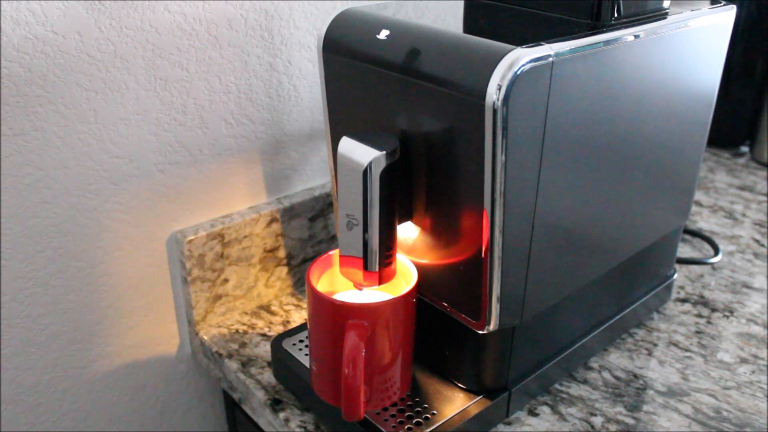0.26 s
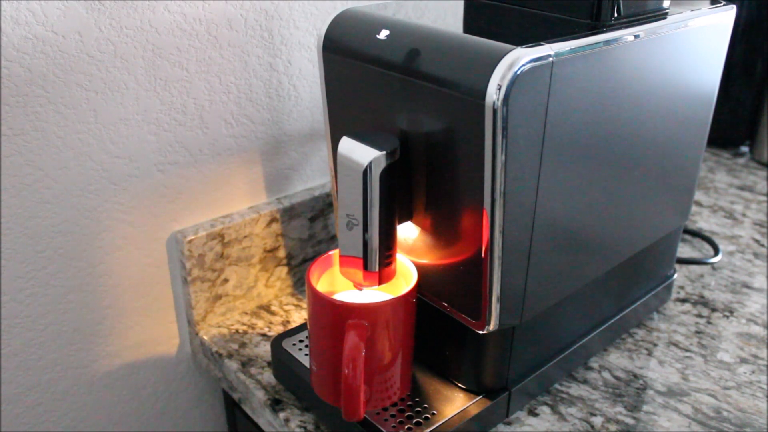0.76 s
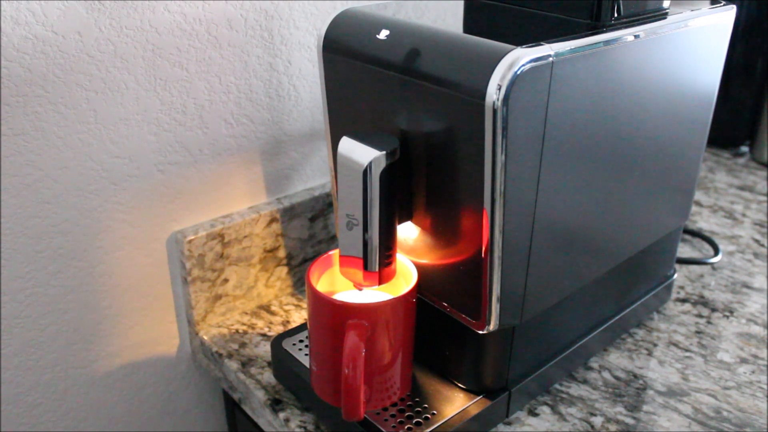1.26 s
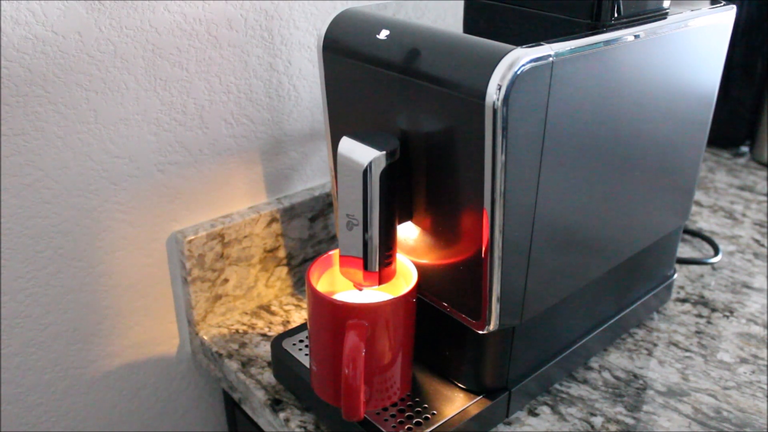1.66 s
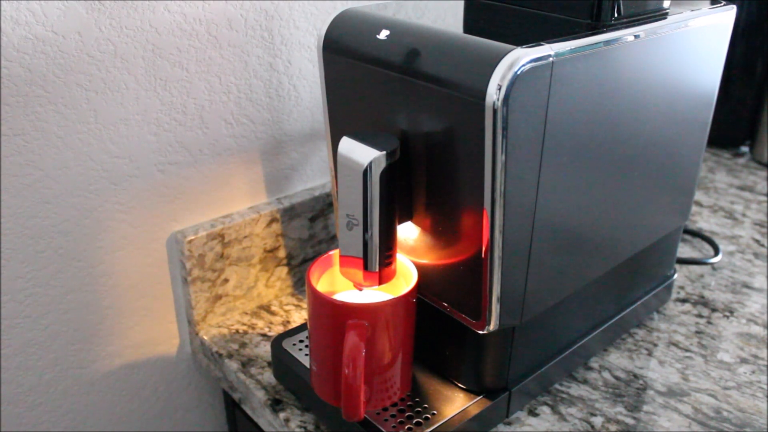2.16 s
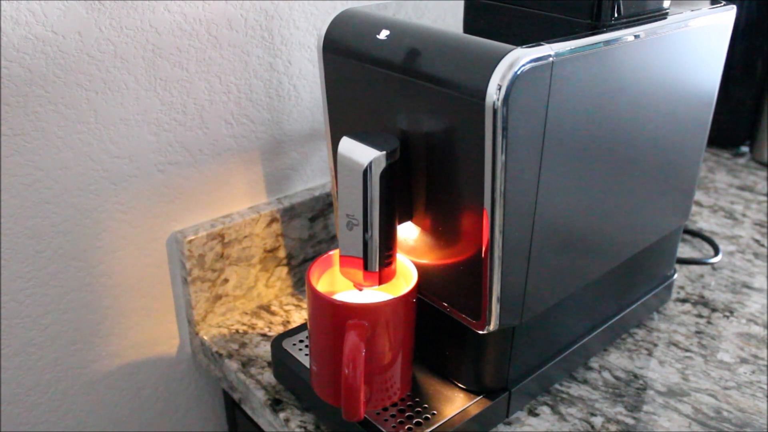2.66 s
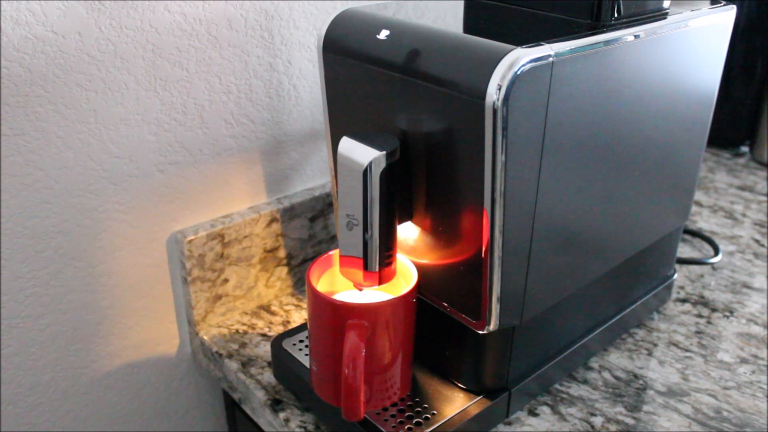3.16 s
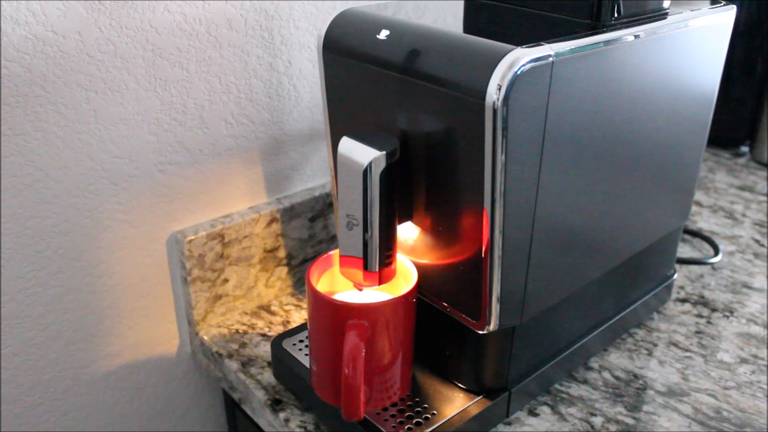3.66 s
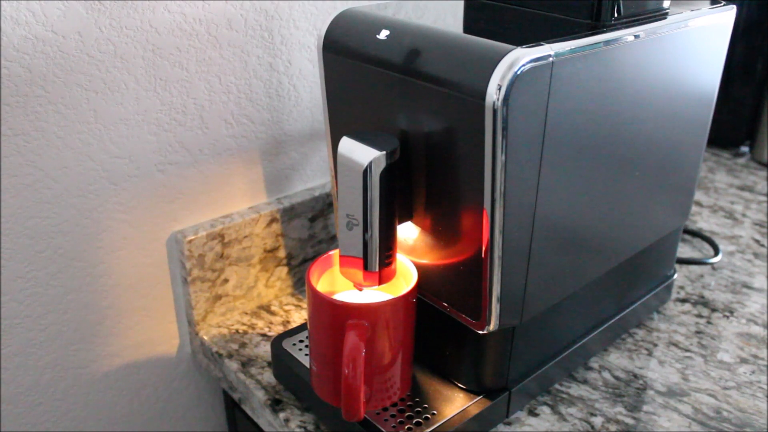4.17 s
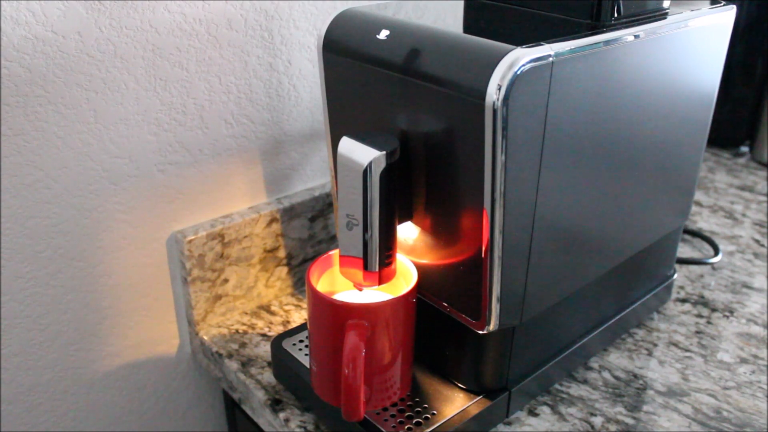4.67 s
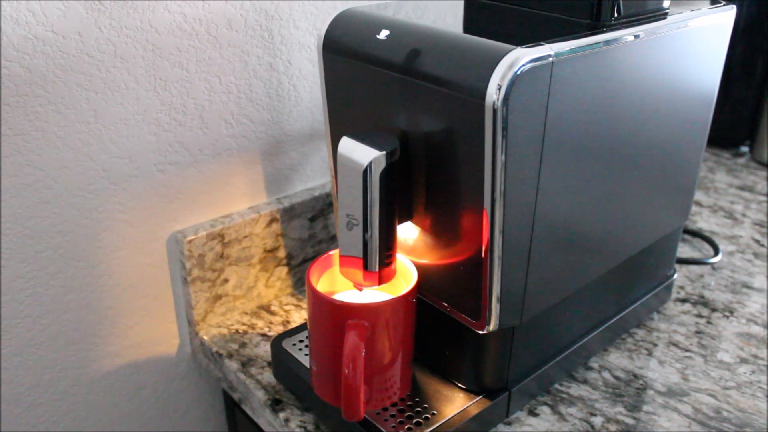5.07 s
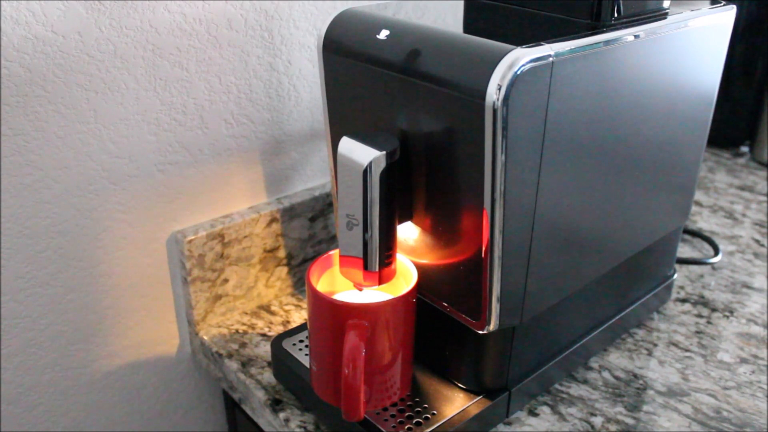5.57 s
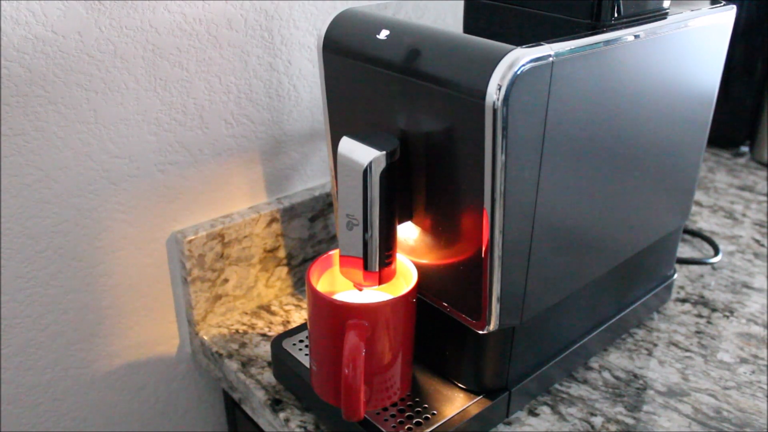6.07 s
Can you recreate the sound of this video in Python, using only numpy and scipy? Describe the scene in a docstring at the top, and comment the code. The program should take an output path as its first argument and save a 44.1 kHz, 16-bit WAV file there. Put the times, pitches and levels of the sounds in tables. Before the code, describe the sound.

A faint switch tick sounds over quiet kitchen hum. A coffee machine's geared motor then starts with a clack and whines for about two seconds, its gears rattling in the plastic housing, until it clacks to a stop. After a short pause it runs again, slightly faster, with a brief moan and a few knocks, ending in another clack. The small, hard room rings lightly.

```python
"""A faint switch tick over quiet kitchen hum, then a coffee machine drives its brewing mechanism
out and back. On each run a geared motor whines, its teeth rattle in the plastic housing and its
brushes hiss. The mechanism clacks as it takes up slack and meets the end stop, the machine shudders
on the counter as the load changes, and a sliding part moans on the way back.
A small hard room rings after it all."""
import sys
import numpy as np
from scipy import signal
from scipy.fft import rfft, irfft
from scipy.io import wavfile
from scipy.ndimage import map_coordinates

SR = 44100
rng = np.random.default_rng(int(sys.argv[2]) if len(sys.argv) > 2 else 0)


def persist_wave(psi):
    """Save psi, clipped to +-1, as 16-bit WAV."""
    counts = np.round(np.clip(psi, -1, 1) * 32767).astype(np.int16)
    wavfile.write(sys.argv[1], SR, np.atleast_2d(counts).T)


N = 279153
T = np.arange(N) / SR
HZ = np.fft.rfftfreq(N, 1 / SR)
OUT, BACK = 0, 1  # direction of travel
MESH = 5  # tooth contacts per shaft turn: the main note of the whine


def amp(db):
    """Decibels to gain."""
    return 10 ** (np.asarray(db) / 20)


def unit(x):
    """Scales to rms 1."""
    return x / np.sqrt(np.mean(x ** 2) + 1e-20)


def curve_at(points, hz):
    """Interpolates a curve on a logarithmic frequency axis."""
    f, value = np.transpose(points)
    return np.interp(np.log(hz + 1), np.log(f + 1), value)


def bell(hz, centre, width):
    """A resonance peak of height 1; width is taken at half height."""
    return 1 / (1 + ((hz - centre) / (width / 2)) ** 2)


def colour(x, gain):
    """Filters a full-length signal by a gain for each frequency."""
    return irfft(rfft(x) * gain, N)


def noise(gain):
    """Coloured noise of rms 1."""
    return unit(colour(rng.standard_normal(N), gain))


def drift(rate_hz):
    """Slow random motion of rms 1."""
    return noise(1 / (1 + (HZ / rate_hz) ** 4))


def impulse(db):
    """The causal impulse response with this spectrum."""
    log_gain = np.log(amp(np.r_[db, db[-2:0:-1]]))
    return np.fft.ifft(np.exp(np.conj(signal.hilbert(log_gain)))).real[:len(db) - 1]


def room_tone():
    """A bed of soft air with a few faint, wavering hum lines."""
    # spectrum of the air: f/Hz, relative level/dB
    air_eq = [(25, -19), (82, -9.5), (123, -13.5), (150, -6.5), (194, -1.5), (310, -5.5), (382, 1),
              (440, -8), (620, -5), (800, -11), (2330, -22), (5000, -28), (9000, -32.5), (15800, -31.5)]
    # hum lines: f/Hz, relative level/dB
    hum_lines = [(150.7, -66), (188.4, -60), (393.0, -70), (473.7, -61.5)]
    air = noise(amp(curve_at(air_eq, HZ)))
    hum = sum(amp(db) * np.sqrt(2) * np.sin(2 * np.pi * hz * T + 0.76 * drift(1.2))
              for hz, db in hum_lines)
    return amp(-51.5) * air + amp(-3) * hum


def blows(hits, body_eq, ring, size=4096):
    """Each blow is a sharp contact and a chatter of loose parts, sounding through body and frame."""
    # modes of the struck frame: f/Hz, relative level/dB, t60/s
    frame_modes = [(372, -6, .08), (560, -3, .07), (765, 0, .1), (1030, -7, .05), (1308, -9, .07),
                   (1600, -6, .06), (1750, -7, .06), (2444, -13, .07)]
    out, t = np.zeros(N), np.arange(2 * size) / SR
    hz = np.fft.rfftfreq(size, 1 / SR)
    octaves = np.log2(np.clip(hz, 200, 8000) / 1000)
    frame = sum(amp(db - 60 * t / t60) * np.cos(2 * np.pi * f * t) for f, db, t60 in frame_modes)
    midrange = signal.butter(2, [300, 2800], "bandpass", fs=SR)  # where the frame radiates
    body = np.pad(impulse(curve_at(body_eq, hz)), (0, len(t) - size // 2))
    response = unit(body) + ring * unit(signal.lfilter(*midrange, frame))
    for s, db, tilt, chatter_s, pitch, boost_db in hits:
        chatter = (1 - np.exp(-t / 0.000059)) * np.exp(-(t / chatter_s) ** 1.21)
        contact = 0.26 * rng.standard_normal(len(t)) * chatter
        contact[0] += 1  # the first sharp impact
        struck_part = impulse(boost_db * bell(hz, pitch, 0.24 * pitch) + tilt * octaves)
        hit = signal.fftconvolve(signal.fftconvolve(contact, struck_part), response)[:len(t)]
        attack_rms = np.sqrt(np.mean(hit[:SR // 50] ** 2))  # first 20 ms
        slot = out[round(s * SR):][:len(hit)]
        slot += amp(db) * hit[:len(slot)] / attack_rms
    return out


def switch_ticks():
    """Small, bright switch contacts that barely ring the frame."""
    # ticks: t/s, attack level/dB, tilt/(dB/octave), chatter/s, part f/Hz, part boost/dB
    hits = [(0.5555, -42.5, -2.5, 0.0099, 3530, 1), (1.0703, -49.5, 11, 0.0041, 5040, 16),
            (2.931, -46, 0, 0.0023, 6455, -7), (4.1578, -49, 1, 0.0039, 1495, 8)]
    # body of a tick: f/Hz, relative level/dB
    body_eq = [(40, -36), (200, 2), (800, -18), (1800, -5), (3500, -4.5), (4600, -6), (5600, -2.5),
               (6500, -8), (9000, -15), (15000, -21)]
    return blows(hits, body_eq, ring=0.15)


def gear_whine(turns, way, flutter, low_db, middle_db):
    """Gear lines locked to the shaft; each flutters on its own in level and phase."""
    # gear lines: multiple of shaft speed, relative level out/dB, relative level back/dB
    partials = [(2, -21, -30), (3, -29, -19), (4, -26, -10), (5, 0, 0), (7, -27, -18), (8, -18, -26),
                (9, -8, -10), (9.5, -16, -33), (10, -10, -9), (11, -20, -20), (11.25, -18, -24),
                (13, -23, -16), (15, -23, -20), (16, -24, -21), (17, -30, -23), (20, -22, -18),
                (21.25, -17, -38), (23, -21, -23), (25, -23, -21), (28, -22, -26)]
    out = np.zeros(N)
    shakes = [drift(30) for _ in range(6)]
    low, middle = amp(low_db), amp(middle_db)
    for multiple, *levels_db in partials:
        gain = low if multiple <= MESH else middle if multiple < 12 else 1
        swell, lag = (np.roll(shakes[i], rng.integers(N)) for i in rng.permutation(6)[:2])
        cycles = multiple * (turns + 0.003 * lag) + rng.random()
        out += amp(levels_db[way]) * gain * (1 + flutter * swell) * np.sin(2 * np.pi * cycles)
    return out


def gear_rattle(turns, housing_eq, repeat, bite=0.45, grit_db=1.2):
    """Teeth scrape inside the housing: the share `repeat` loops with a wheel, the rest is chance."""
    # narrow resonances of the housing: f/Hz, width/Hz, boost/dB
    panels = [(1514, 125, 3), (1762, 125, 4), (2040, 43, 10), (2120, 21, 6.5), (2420, 135, 10.5),
              (2560, 11, 11.5), (2930, 20, 6), (3165, 150, 8), (4170, 51, 9.5)]
    surface = rng.standard_normal(1536)
    position = (turns / 4 % 1) * len(surface)  # the wheel goes round once in four shaft turns
    wheel = map_coordinates(surface, [position], order=3, mode="grid-wrap")
    scrape = np.sqrt(repeat) * unit(wheel) + np.sqrt(1 - repeat) * rng.standard_normal(N)
    teeth = MESH * turns
    force = amp(grit_db * rng.standard_normal(N))[teeth.astype(int)]  # no two teeth land equally hard
    scrape *= force * (1 + bite * np.cos(2 * np.pi * teeth))
    gain = amp(curve_at(housing_eq, HZ) + sum(db * bell(HZ, hz, width) for hz, width, db in panels))
    gain *= HZ ** 2 / (HZ ** 2 + 150 ** 2)  # low cut
    presence = (HZ > 1400) & (HZ < 4500)  # this band sets the level
    return colour(unit(scrape), gain / np.sqrt(np.mean((gain * presence) ** 2)))


def brush_hiss(turns, way):
    """Carbon brushes hiss on the commutator, swelling once a turn, and ring small metal parts."""
    # metal resonances: f/Hz, width/Hz, relative level out/dB, relative level back/dB
    resonances = [(5980, 90, -5, -9), (6270, 130, 0, -2), (6550, 200, -6, 0), (6820, 70, 0, -6),
                  (7020, 60, -6, -14), (7240, 150, -3, -3), (7540, 200, -6, -6), (7850, 200, -10, -11),
                  (15550, 400, -35, -16)]
    power = sum(amp(levels_db[way]) ** 2 * bell(HZ, hz, width) ** 1.74
                for hz, width, *levels_db in resonances)
    return noise(np.sqrt(power)) * (1 + 0.22 * np.cos(2 * np.pi * turns))


def counter_rumble(thump_db=0):
    """Low vibration that the machine sends into the counter, at rms 1; a jolt adds a thump."""
    # f/Hz, relative level/dB
    rumble_eq = [(25, -21), (75, -9), (115, -6.5), (200, -1), (300, 2.5), (450, -2.5), (2000, -70)]
    return noise(amp(curve_at(rumble_eq, HZ) + thump_db * bell(HZ, centre=80.5, width=46)))


def whistle(speed, turns, multiple=90):
    """A high shaft harmonic whistles, thin and blurred, as it crosses a narrow resonance."""
    nearness = bell(multiple * speed, centre=10380, width=160)
    return amp(-68.5) * nearness * np.sin(2 * np.pi * multiple * turns + 0.92 * drift(60))


def motor_run(way, speeds, housing_eq, start_s, stop_s, crest_s, whine_db, middle_db, middle_db_per_s,
              rattle_db, rumble_db, brush_db, repeat, flutter):
    """The geared motor spins up, works and coasts; its speed sets the gears' pitch and level."""
    # dips of the main note and the lines below it: t/s, half length/s, depth/dB
    dips = [(1.17, 0.14, 10), (1.416, 0.024, 5.5), (2.268, 0.037, 3.5), (2.436, .05, 7), (4.488, 0.06, 29),
            (4.855, 0.12, 2.5), (5.97, 0.08, 1.5)]
    age = np.clip(T - start_s, 0, stop_s - start_s)
    starting = np.exp(-age / 0.03)
    coast_s = np.clip(T - stop_s, 0, 0.2)
    working_hz = np.interp(T, *np.transpose(speeds))
    speed = working_hz * (1 - 0.13 * starting) - 200 * coast_s
    turns = np.cumsum(speed * (1 + 0.0012 * drift(8))) / SR
    envelope = (T > start_s) * amp(-11 * starting - 387 * coast_s)
    dip_db = sum(depth * np.exp(-((T - s) / length) ** 2) for s, length, depth in dips)
    low_db = 0.14 * drift(9.4) - dip_db
    # a slow, slightly eccentric wheel sways the middle lines, with one crest at crest_s
    sway_db = 2.5 * np.cos(2 * np.pi * (turns - np.interp(crest_s, T, turns)) / 21.4)
    travel_db = middle_db_per_s * (age - (stop_s - start_s) / 2)
    whine = gear_whine(turns, way, flutter, low_db, middle_db + sway_db + travel_db)
    rattle = gear_rattle(turns, housing_eq, repeat)
    hiss = brush_hiss(turns, way)
    excess_hz = working_hz - 118  # faster gears are louder
    gears = amp(whine_db + 0.22 * excess_hz) * whine + amp(rattle_db + 0.6656 * excess_hz) * rattle
    rumble = amp(rumble_db) * counter_rumble()
    return envelope * (gears + rumble + amp(brush_db) * hiss + whistle(speed, turns))


def run_out():
    """The motor drives the mechanism out, with a rattle that mostly loops."""
    # shaft speed under the changing load: t/s, f/Hz
    speeds = [(1.18, 113.9), (1.218, 116.8), (1.302, 109.2), (1.38, 114.9), (2.154, 114.6), (2.626, 120),
              (2.812, 118.7), (2.886, 115.4), (2.94, 115.9)]
    # what the housing lets out of the rattle: f/Hz, relative level/dB
    housing_eq = [(200, -11), (360, 2), (560, 3), (850, 4.5), (1200, 4.5), (1600, -1), (2700, -5.5),
                  (3500, 1), (4300, -6), (4800, -13), (8700, -26.5), (15500, -40.5)]
    return motor_run(OUT, speeds, housing_eq, start_s=1.07, stop_s=2.925, crest_s=1.474,
                     whine_db=-28.2, middle_db=-1.1, middle_db_per_s=-1.5,
                     rattle_db=-37.5, rumble_db=-61, brush_db=-51.5, repeat=0.65, flutter=0.09)


def mechanism_clacks():
    """The mechanism knocks as it takes up its slack and as it meets the end stop."""
    # clacks: t/s, attack level/dB, tilt/(dB/octave), chatter/s, part f/Hz, part boost/dB
    hits = [(1.1208, -19, -0.5, 0.0078, 1580, 2), (1.1255, -23, -5.5, 0.0087, 360, 2.5),
            (2.9778, -23, 1.5, 0.0057, 1710, 5.5), (2.983, -24, -4.5, 0.017, 725, 5),
            (3.027, -37, -10, 0.01, 1720, 6), (4.184, -29.5, -3, 0.011, 203, 23),
            (4.189, -26, -1.5, 0.009, 416, 26), (4.2212, -25.5, 6.5, 0.018, 990, 9),
            (4.598, -32.5, -1, 0.03, 363, 15), (4.622, -31.5, -4, 0.011, 450, -2),
            (6.2395, -23, 0.5, 0.0047, 1470, 0), (6.2435, -20, -1.7, 0.0049, 558.6, 2),
            (6.25, -28.5, 2, 0.0085, 393.3, 15)]
    # body of a clack: f/Hz, relative level/dB
    body_eq = [(40, -56), (75, -14), (115, -31), (200, -6), (300, -6), (390, 1.5), (550, 1.5), (770, 1),
               (1000, -1.5), (1700, -2.5), (2400, -11), (4000, -15.5), (8500, -32.5), (15000, -52)]
    return blows(hits, body_eq, ring=0.26)


def shudders(rise_s=0.019):
    """The machine shakes the counter at each change of load: a quick swell that dies away."""
    # jolts: t/s, level/dB, fade/s, thump boost/dB
    jolts = [(1.14, -38, 0.064, -12), (2.89, -46, 0.08, 11), (4.2, -33.5, .11, 2.5),
             (4.61, -42.5, 0.051, 14), (6.24, -42, 0.069, 9)]
    return sum(amp(db) * counter_rumble(thump_db) * np.exp(-np.maximum((s - T) / rise_s, (T - s) / fade))
               for s, db, fade, thump_db in jolts)


def run_back():
    """The motor brings the mechanism back, a little faster, with a more random rattle."""
    # shaft speed under the changing load: t/s, f/Hz
    speeds = [(4.22, 115.1), (4.33, 123.9), (4.53, 124.9), (4.63, 122.8), (4.72, 119.2), (5.1, 118.7),
              (5.4, 120.4), (5.85, 119.2), (6.09, 121.1), (6.21, 117.7)]
    # what the housing lets out of the rattle: f/Hz, relative level/dB
    housing_eq = [(200, -22), (380, 1.5), (600, 4.5), (850, 5.5), (1200, 4), (1700, 1), (2700, -5.5),
                  (3300, 1), (4400, -2.5), (4850, -15.5), (5500, -11.5), (9000, -24), (15500, -36)]
    return motor_run(BACK, speeds, housing_eq, start_s=4.157, stop_s=6.24, crest_s=5.52,
                     whine_db=-31, middle_db=-2, middle_db_per_s=1.4,
                     rattle_db=-38.5, rumble_db=-61.5, brush_db=-52, repeat=0.3, flutter=0.12)


def slide_moan():
    """A sliding part sticks and slips: a rough, sagging tone with a weaker partial over it."""
    # contour of the moan: t/s, f/Hz, level/dB
    contour = [(4.41, 730, -52), (4.45, 750, -36), (4.49, 740, -33.5), (4.515, 705, -34), (4.55, 670, -50)]
    s, hz, db = np.transpose(contour)
    phase = 2 * np.pi * np.cumsum(np.interp(T, s, hz) + 28 * drift(44.2)) / SR
    tone = (1 + 0.41 * drift(70)) * np.sin(phase)
    overtone = amp(-7) * drift(36) * np.sin(1.4 * phase)
    return amp(np.interp(T, s, db)) * (tone + overtone) * (T > s[0]) * (T < s[-1])


def kitchen_reverb(send, predelay_s=0.011, taps_per_s=3000):
    """Reflections from walls and counter: sparse taps, each band dying at its own speed."""
    # decay of the room: f/Hz, t60/s
    decay = [(200, 0.35), (600, 0.73), (1400, 0.69), (3700, 0.53), (10000, 0.33)]
    taps = rng.standard_normal(SR) * (rng.random(SR) < taps_per_s / SR) * (T[:SR] > predelay_s)
    hz, t, bands = signal.stft(taps, SR, nperseg=256)
    fade = amp(-60 * t / curve_at(decay, hz)[:, None])
    tail = signal.istft(bands * fade, SR, nperseg=256)[1]
    return signal.fftconvolve(send, tail / np.linalg.norm(tail))[:N]


def scene():
    """Two motor runs with their ticks and clacks, in the kitchen."""
    machine = run_out() + run_back() + slide_moan() + shudders()
    clacks = mechanism_clacks()
    ticks = switch_ticks()
    reverb = kitchen_reverb(amp(-15) * machine + amp(-9.5) * clacks + amp(-7.5) * ticks)
    return (machine + clacks + ticks + reverb + room_tone())[None]


def record(dry):
    """A steep high cut takes off the very top."""
    high_cut = signal.firwin(511, 15950, window=("kaiser", 9), fs=SR)
    return signal.oaconvolve(dry, high_cut[None], "same")


dry = scene()
out = record(dry)
persist_wave(out)
```